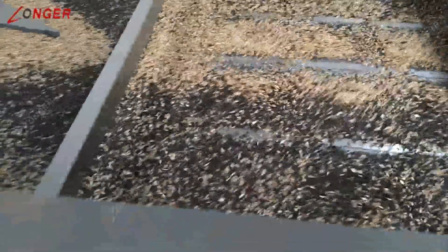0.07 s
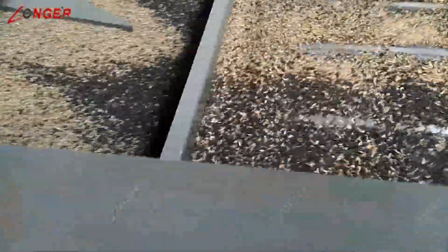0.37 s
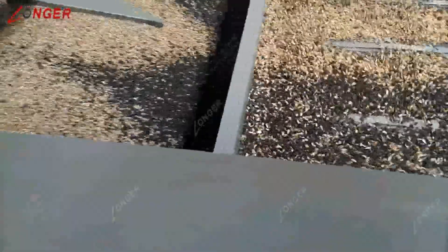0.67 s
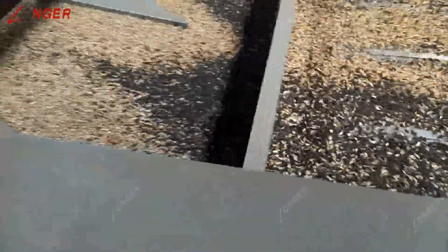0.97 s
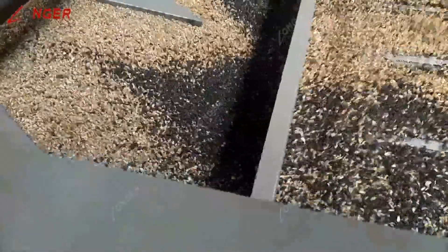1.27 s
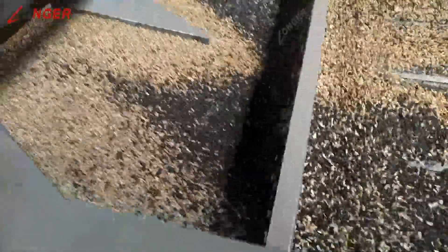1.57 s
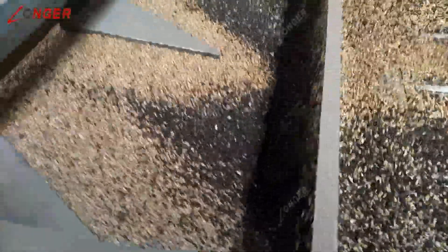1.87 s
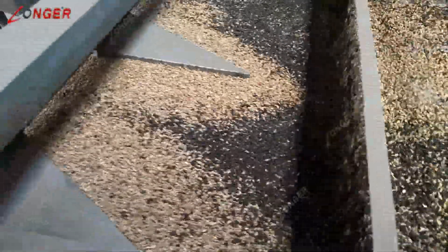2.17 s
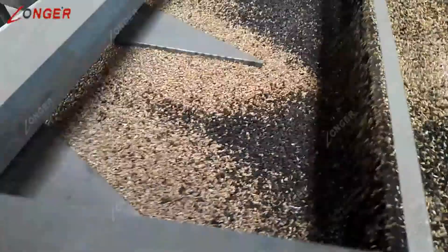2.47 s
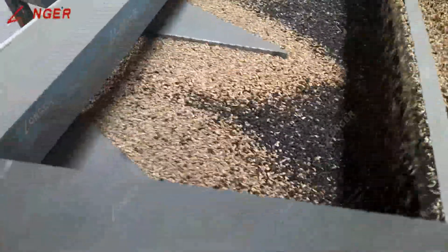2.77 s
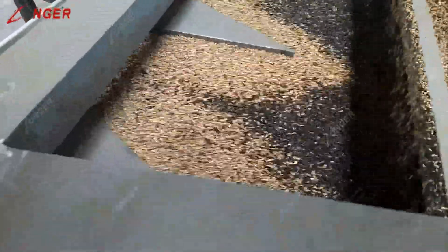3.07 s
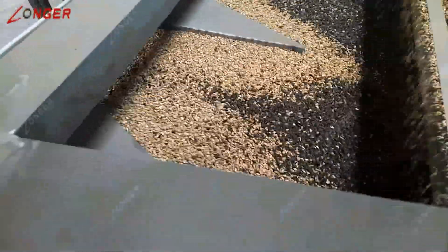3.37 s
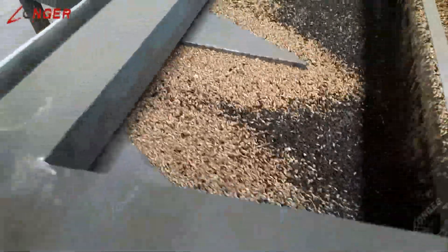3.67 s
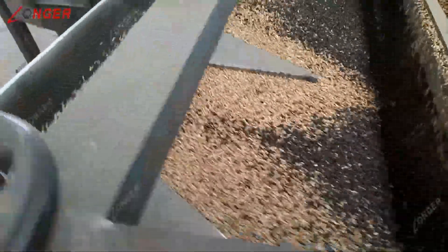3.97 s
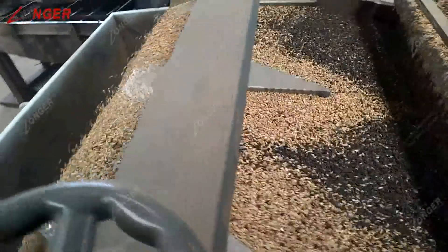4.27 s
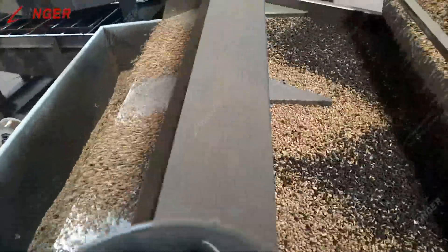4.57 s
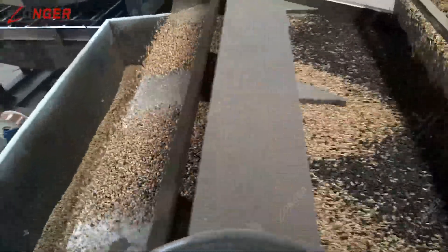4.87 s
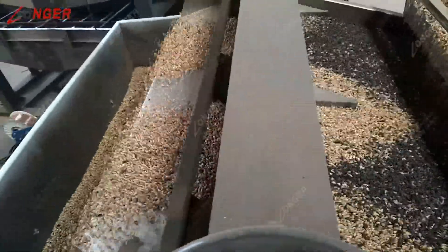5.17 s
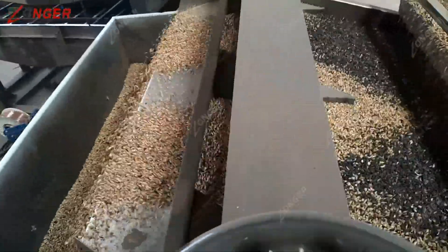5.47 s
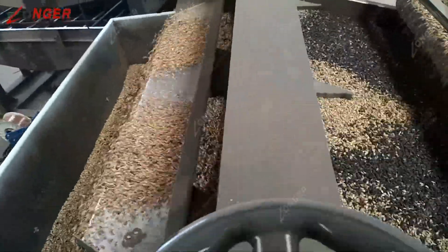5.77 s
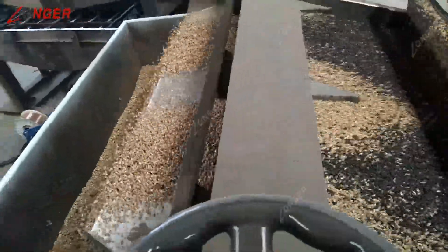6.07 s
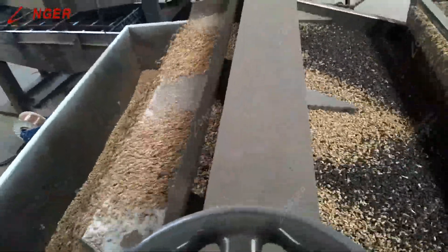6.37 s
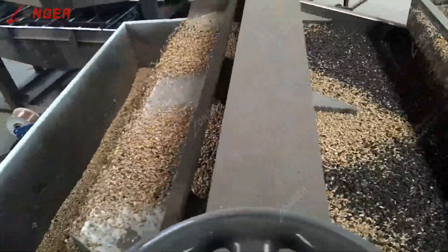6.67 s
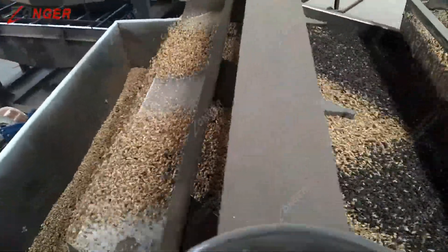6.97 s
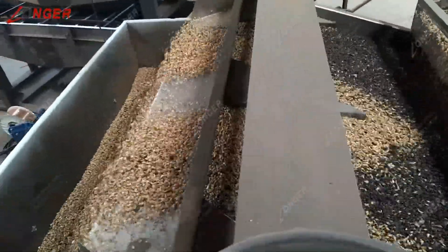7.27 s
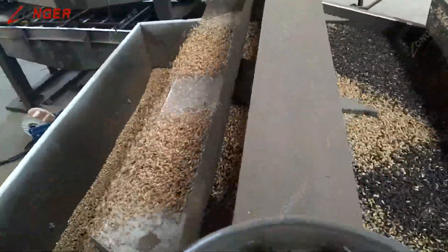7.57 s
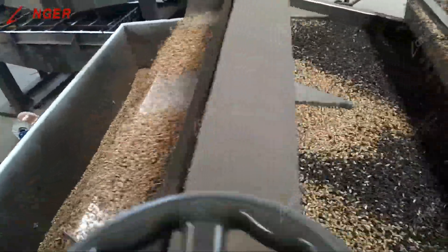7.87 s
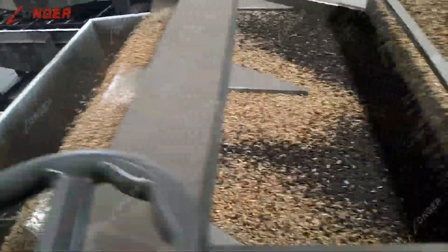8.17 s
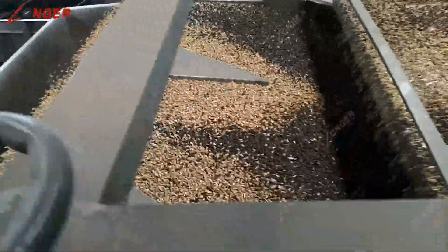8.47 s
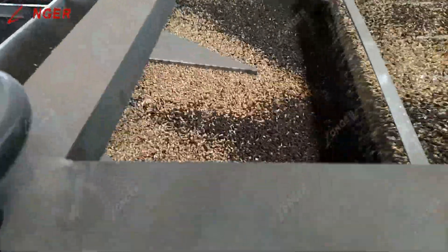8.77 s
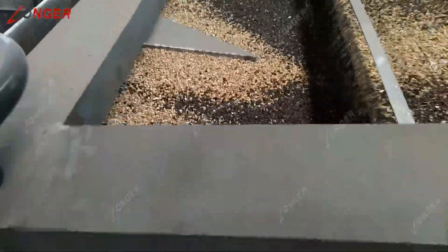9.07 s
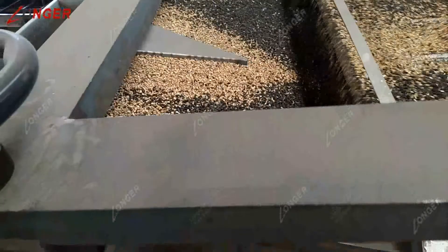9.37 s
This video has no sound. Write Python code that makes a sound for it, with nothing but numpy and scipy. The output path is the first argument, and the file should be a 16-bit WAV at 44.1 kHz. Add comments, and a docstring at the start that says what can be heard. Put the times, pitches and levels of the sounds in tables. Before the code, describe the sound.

Seeds patter and slide on the steel deck of a vibrating sorting machine in a factory, making a bright, rapidly pulsing rustle. Underneath, the frame drones, loose joints thud in time with the shaking, and a fan blows a steady rush of air. Midway, a thin whistle swells and drops away. The close microphone moves from the deck to the outlet chute, where the air sounds hollower, then partway back.

```python
"""A fast, pulsing patter and rustle of seeds over a low drone and a rush of air: a seed-sorting table.
Its deck shakes 16.5 times a second. Each stroke tosses the seeds, which land and then slide over
each other. The off-centre drive makes the steel frame hum and its loose joints knock, while a fan
blows air up through the seeds. Midway, a thin whistle swells and drops away. The mix shifts as the
listener moves from the deck to the outlet chute and part of the way back."""
import sys
import numpy as np
from scipy import signal
from scipy.fft import rfft, irfft, next_fast_len
from scipy.io import wavfile
from scipy.ndimage import map_coordinates

SR = 44100
rng = np.random.default_rng(int(sys.argv[2]) if len(sys.argv) > 2 else 0)


def master(y):
    """Save y as 16-bit WAV."""
    cut = np.clip(np.atleast_2d(y).T, -1, 1)
    pcm = np.round(cut * 32767)  # scale
    wavfile.write(sys.argv[1], SR, pcm.astype(np.int16))


N = 420273
TIME = np.arange(N) / SR
SHAKE_HZ, FIRST_LANDING_S = 16.5, .0212

# How the landing swells in each stroke. In order: rise, hold and fall in seconds, depth in dB.
LANDING_SWELL = (.0095, .008, .042, 9.3)
# How the sliding swells in each stroke. In order: rise, hold and fall in seconds, depth in dB.
SLIDING_SWELL = (.0195, .003, .0235, 9.4)
# The tick of a seed on the deck. Each row: frequency in Hz, level in dB.
DECK_TICK_TONE = [(1200, -32), (2200, -7.5), (3400, -12), (4400, -4), (5300, -8), (6200, -2.5),
                  (7200, -0.5), (8300, 3.5), (10500, 2), (11900, -1.5), (13000, -8), (15400, -15.5)]
# The tick of one seed husk on another. Each row: frequency in Hz, level in dB.
HUSK_TICK_TONE = [(2000, -20), (4500, -12), (6200, -7.5), (7200, -11.5), (8200, -1), (9400, 2.5),
                  (10700, 3), (11900, -7.5), (13000, -19), (15400, -22)]
# The ringing notes of the steel deck. Each row: pitch in Hz, width in Hz, level in dB.
DECK_NOTES = [(1900, 210, 0), (2280, 120, -15), (4500, 330, -10.5), (5970, 250, -11)]
# The seeds are louder when they are near. Each row: time in seconds, gain in dB.
SEED_LEVELS = [(0, -15.5), (1.6, -14.5), (2.1, -15), (4.3, -16), (7.5, -15.5), (8.35, -14.5), (9.53, -15)]
# The notes in the frame's drone. Each row: multiple of the shaking rate, level in dB.
FRAME_NOTES = [(3, -16), (4, -9.5), (5, -4.5), (6, -15), (7, -6), (8, -5.5), (9, -0.5), (11, -7),
               (12, -5.5), (13, -1.5), (14, -7), (17, -5), (18, -7), (20, -7), (22, -1.5), (29, -10.5)]
# The frame is louder in some spots. Each row: time in seconds, drone gain in dB, panel boom in dB.
DRONE_LEVELS = [(0, -26.6, -42), (1.2, -26, -40), (2.6, -26.5, -38.7), (3.45, -25.5, -34.5),
                (4.5, -26.1, -39), (5.5, -25, -38.5), (7.0, -25.5, -36.5), (7.7, -24.5, -31),
                (9.53, -25.5, -35)]
# The knocks of loose joints. Each row: place in the stroke from 0 to 1, strength in dB.
JOINT_KNOCKS = [(0.461, 7), (0.668, -2)]
# The panels rung by those knocks. Each row: pitch in Hz, width in Hz, level in dB.
PANEL_NOTES = [(165, 60, -13), (271, 120, 7), (355, 94, -6.5)]
# The roar of the fan and the hall. Each row: frequency in Hz, level in dB.
ROAR_TONE = [(20, -30), (42, -27), (62, -19), (95, -7), (125, -0.5), (200, 0), (360, -1), (440, -5),
             (750, -6.5), (1000, -8), (1600, -6.5), (2700, -12.5), (5000, -10), (14000, -25.5)]
# Hollows in the housing that ring in the roar. Each row: pitch in Hz, width in Hz, level in dB.
HOUSING_NOTES = [(68.2, 5.2, -6), (121.6, 10, 0.5), (286, 20, -4), (362, 19, -9), (1930, 280, -8)]
# The hollow notes of the air duct. Each row: pitch in Hz, width in Hz, level in dB.
DUCT_NOTES = [(563, 33, 2.5), (733, 120, -3), (856, 41, 8), (1079, 25, 5), (1144, 31, 2.5)]
# How the whistle swells. In order: rise, hold and fall in seconds, depth in dB.
WHISTLE_SWELL = (0.52, .57, .08, 29)
# The listener's path. Each row: time in seconds, place from 0 (over the deck) to 1 (at the chute).
LISTENER_PATH = [(0, 0.38), (1.6, 0), (3.9, 0.14), (4.4, 0.53), (5.9, 0.86), (8.0, 0.91), (9.53, 0.68)]


def seeds(stroke, slide_db, scatter=0.0074, uneven_db=0.5):
    """Seeds patter onto the deck early in each stroke, then rustle as it swings back under them."""
    lag_s = 0.018 - 0.0012 * TIME  # the slide follows the landing ever more closely
    toss = stroke + scatter * wander(7.5)  # no two tosses are timed quite alike
    fall = gain(swell(toss % 1 / SHAKE_HZ, *LANDING_SWELL))
    slip = gain(swell((toss - lag_s * SHAKE_HZ) % 1 / SHAKE_HZ, *SLIDING_SWELL))
    # a faster deck brings both more hits and harder ones
    landing = fall ** .5 * tiny_hits(fall, per_s=8000)
    sliding = slip ** .5 * tiny_hits(slip, per_s=12000)
    patter = set_level(colour(landing + ring(landing, DECK_NOTES), DECK_TICK_TONE), -1.52)
    rustle = set_level(colour(sliding, HUSK_TICK_TONE), -4.0) * gain(slide_db)
    return (patter + rustle) * gain(uneven_db * wander(27))


def tiny_hits(density, per_s, spread_db=2.0):
    """Seeds strike at random, some harder than others, and more often where the density is high."""
    hits = rng.random(N) < per_s / SR * density / density.mean()
    return hits * rng.choice([-1, 1], N) * gain(spread_db * np.minimum(rng.standard_normal(N), 2))


def frame_drone(stroke, waver=0.37, points=24):
    """The frame hums at multiples of the shaking rate; the shifting load makes each note waver."""
    sway_times = np.linspace(0, TIME[-1], points)
    hum = 0
    for multiple, db in FRAME_NOTES:
        # complex numbers let one sway nudge both the strength and the timing of the wave
        nudges = rng.standard_normal(points) + 1j * rng.standard_normal(points)
        sway = np.interp(TIME, sway_times, nudges)
        wave = np.exp(2j * np.pi * (multiple * stroke + rng.random()))
        hum = hum + gain(db) * np.real((1 + waver * sway) * wave)
    return set_level(hum, -6.0)


def joint_knocks(stroke, uneven_db=3.0, slack_s=0.00055):
    """Loose joints thud at nearly the same points of every stroke and ring the panels."""
    blows = np.zeros(N)
    for share, db in JOINT_KNOCKS:
        due = np.flatnonzero(np.diff(np.floor(stroke - share)))
        late, strength = rng.standard_normal((len(due), 2)).T
        struck = np.clip(due + (late * slack_s * SR).astype(int), 0, N - 1)
        blows[struck] += gain(db + uneven_db * strength)
    # a blunt blow has little treble, and the panels give off little bass
    thuds = signal.sosfilt(signal.butter(2, [130, 430], "bandpass", fs=SR, output="sos"), blows)
    return set_level(ring(thuds, PANEL_NOTES), -14.0)


def panel_boom(stroke, db, multiple=10):
    """One panel rings along with a multiple of the shaking rate and holds a low note."""
    return np.sqrt(2) * gain(db) * np.sin(2 * np.pi * multiple * stroke)


def air_roar(treble_db, bass_db, flutter_db=0.58):
    """Swirling air roars through the housing and rings its hollows; the treble flutters a little."""
    roar = colour(rng.standard_normal(N), ROAR_TONE) + ring(rng.standard_normal(N), HOUSING_NOTES)
    roar /= np.std(roar)
    bass = signal.sosfiltfilt(signal.butter(2, 400, fs=SR, output="sos"), roar)
    treble = roar - bass
    return bass * gain(bass_db) + treble * gain(treble_db + flutter_db * wander(8.7))


def air_duct(db, swing_db=2.0):
    """Air rings the hollow notes of the duct, each swelling and fading by itself."""
    notes = sum(ring(rng.standard_normal(N), [note]) * gain(swing_db * wander(2.7))
                for note in DUCT_NOTES)
    return set_level(notes, db)


def fan_blades(db, swing_db=2.7):
    """The spinning blades sing one slightly unsteady note."""
    return tone(hz=593.7, db=db + swing_db * wander(6), drift_hz=3.22, drift_rate_hz=10.9)


def whistle(start_s=4.4, held_db=-33, flicker_db=2.8):
    """A thin, flickering whistle rises from almost nothing, holds, then drops away."""
    db = held_db + swell(TIME - start_s, *WHISTLE_SWELL) + flicker_db * wander(24)
    return tone(hz=1294.5, db=db, drift_hz=5.1, drift_rate_hz=25)


def beam_shadow(x, above_hz=12100, open_db=1.6, start_s=8.5, fade_db_per_s=5.5):
    """The highest treble fades as the listener moves behind a cross beam, which blocks short waves."""
    top_db = open_db - fade_db_per_s * np.maximum(TIME - start_s, 0)
    top = signal.sosfiltfilt(signal.butter(4, above_hz, "highpass", fs=SR, output="sos"), x)
    return x + top * (gain(top_db) - 1)


def side_echoes(x, echo_db=-25, sway=0.0407, count=3):
    """The steel sides throw back faint, quick echoes whose paths shift as the listener sways."""
    out = x
    for delay_s in rng.uniform(.002, .009, count):
        delay = delay_s * SR * (1 + sway * wander(0.37))
        out = out + gain(echo_db) * map_coordinates(x, [np.arange(N) - delay], order=3)
    return out


def gain(db):
    """Turn decibels into a number to multiply by."""
    return 10 ** (np.asarray(db) / 20)


def set_level(x, db):
    """Scale a sound to an average (rms) level."""
    return x * gain(db) / np.sqrt(np.mean(x ** 2))


def follow(table):
    """Join a table's timed rows with straight lines, giving one curve per value column."""
    times, *columns = np.transpose(table)
    return [np.interp(TIME, times, column) for column in columns]


def swell(since_s, rise_s, hold_s, fall_s, depth_db):
    """A level in dB that climbs from the depth up to 0, holds and falls back."""
    return np.interp(since_s, np.cumsum([0, rise_s, hold_s, fall_s]), [-depth_db, 0, 0, -depth_db])


def wander(rate_hz):
    """A smooth random drift of typical size 1; a higher rate makes it move faster."""
    size = next_fast_len(N)
    hz = np.arange(size // 2 + 1) * SR / size
    slow_part = rfft(rng.standard_normal(size)) * np.exp(-(hz / rate_hz) ** 2)
    return set_level(irfft(slow_part, size)[:N], 0)


def tone(hz, db, drift_hz, drift_rate_hz):
    """A pure note with a wavering pitch."""
    pitch_hz = hz + drift_hz * wander(drift_rate_hz)
    return np.sqrt(2) * gain(db) * np.sin(2 * np.pi * np.cumsum(pitch_hz) / SR)


def ring(x, notes):
    """Let a sound ring a set of notes; the narrower a note, the longer it rings."""
    return sum(gain(db) * signal.lfilter(*signal.iirpeak(hz, hz / width, fs=SR), x)
               for hz, width, db in notes)


def colour(x, points, size=8192):
    """Shape the bass and treble of a sound along a table of frequencies and levels."""
    hz, db = np.transpose(points)
    grid_hz = np.maximum(np.arange(size // 2 + 1) * SR / size, 1)
    gains = gain(np.interp(np.log(grid_hz), np.log(hz), db))
    # move all ringing to after each click, so the click keeps its sharp start
    cepstrum = irfft(np.log(gains))
    cepstrum[1:size // 2] *= 2
    cepstrum[size // 2 + 1:] = 0
    click_response = irfft(np.exp(rfft(cepstrum)))
    return signal.fftconvolve(x, click_response)[:N]


def scene():
    """Seeds, frame and joints share one beat, the fan runs freely, and the listener's place sets the mix."""
    at_chute, = follow(LISTENER_PATH)
    seed_db, = follow(SEED_LEVELS)
    drone_db, boom_db = follow(DRONE_LEVELS)
    stroke = (TIME - FIRST_LANDING_S) * SHAKE_HZ  # counts up by one with every shake
    seed_bed = beam_shadow(seeds(stroke, slide_db=1.4 * at_chute)) * gain(seed_db)
    machine = (frame_drone(stroke) + joint_knocks(stroke)) * gain(drone_db)
    machine += panel_boom(stroke, boom_db)
    fan = fan_blades(db=-43 + 2.5 * at_chute)
    fan += air_roar(treble_db=-21 + at_chute, bass_db=drone_db + 4.36)  # more bass near the frame
    fan += air_duct(db=-43 + 11 * at_chute)
    mono = whistle() + side_echoes(seed_bed) + machine + fan
    return np.array([mono, mono])


def record(dry, ceiling=.9, top_hz=15500):
    """Round off the tallest peaks and cut away the very highest treble."""
    rounded = dry / (1 + (dry / ceiling) ** 8) ** (1 / 8)
    return signal.sosfiltfilt(signal.ellip(12, .05, 60, top_hz, fs=SR, output="sos"), rounded)


dry = scene()
out = record(dry)
master(out)
```